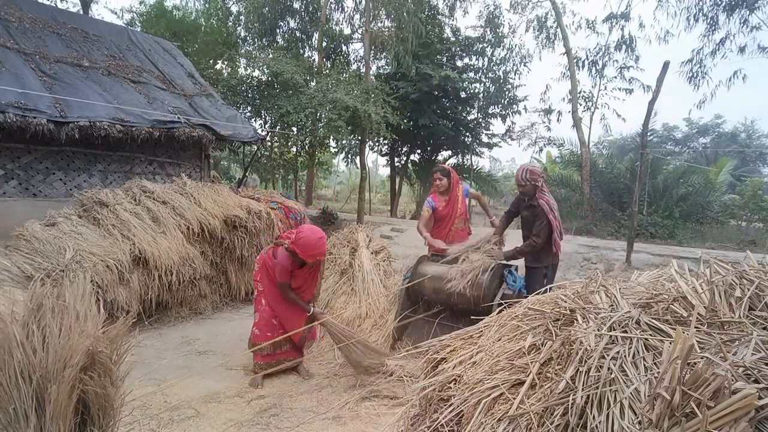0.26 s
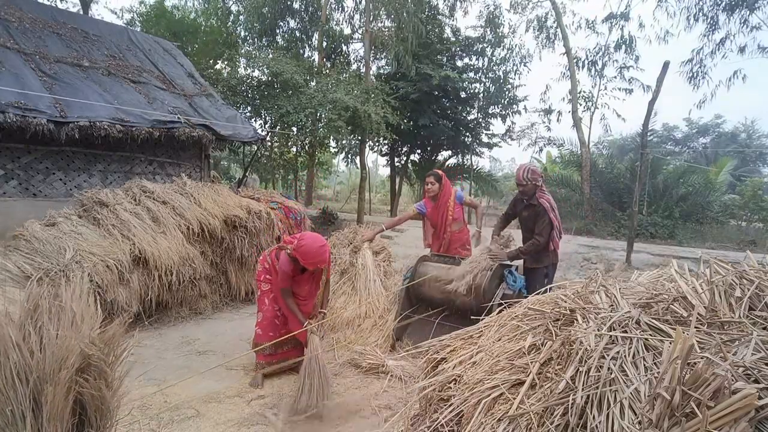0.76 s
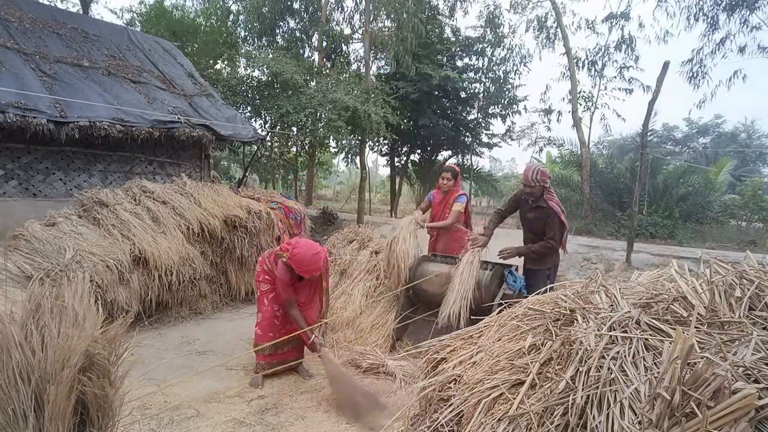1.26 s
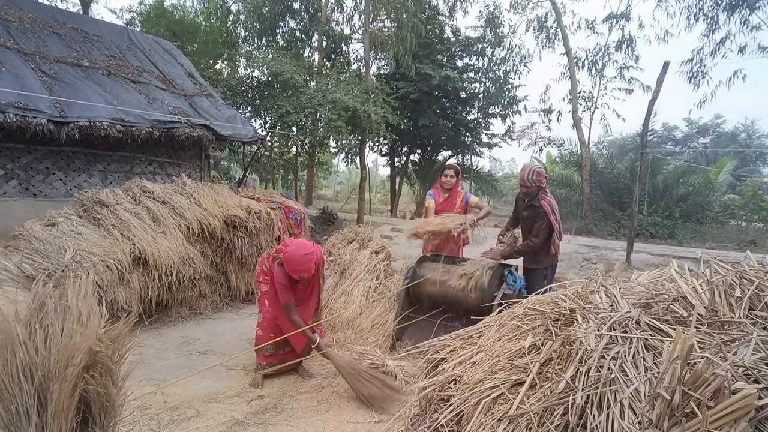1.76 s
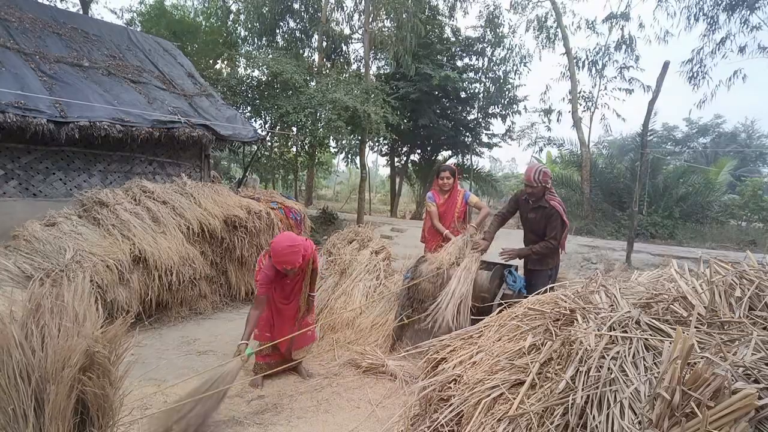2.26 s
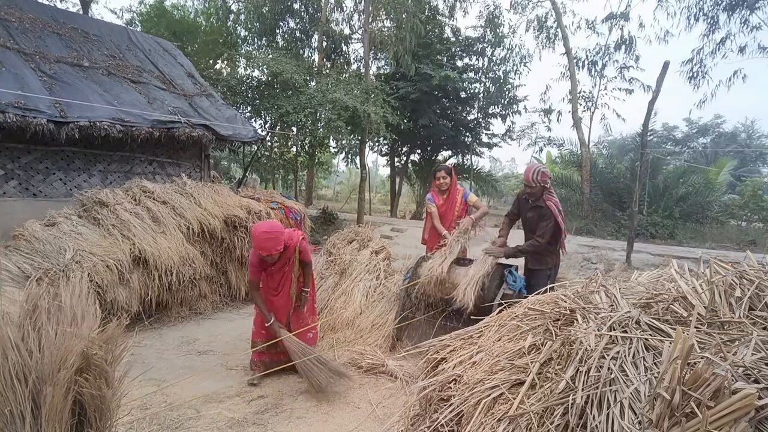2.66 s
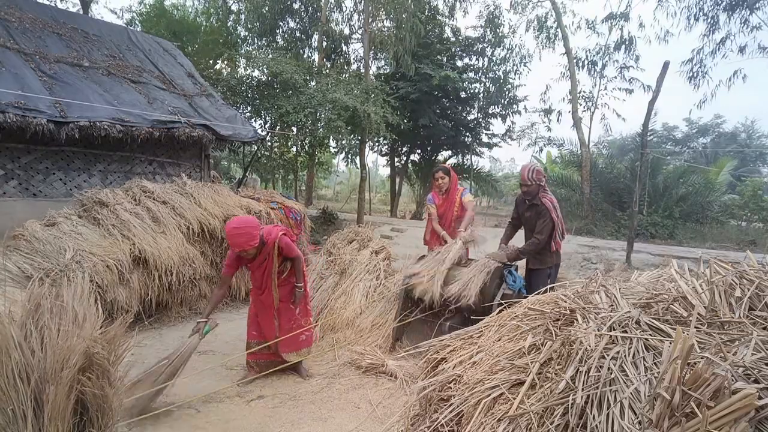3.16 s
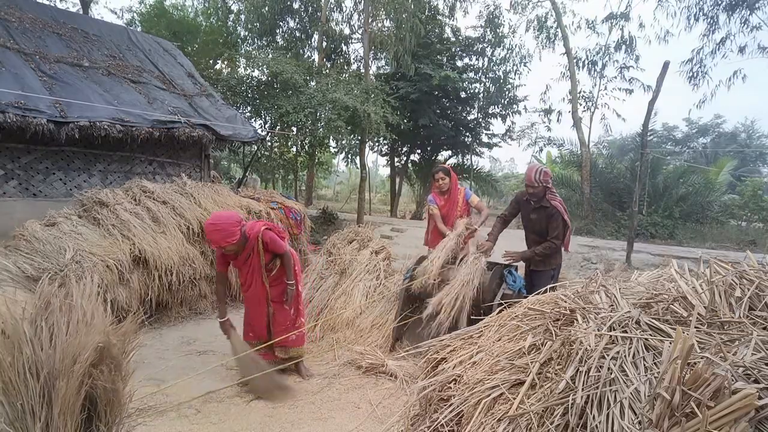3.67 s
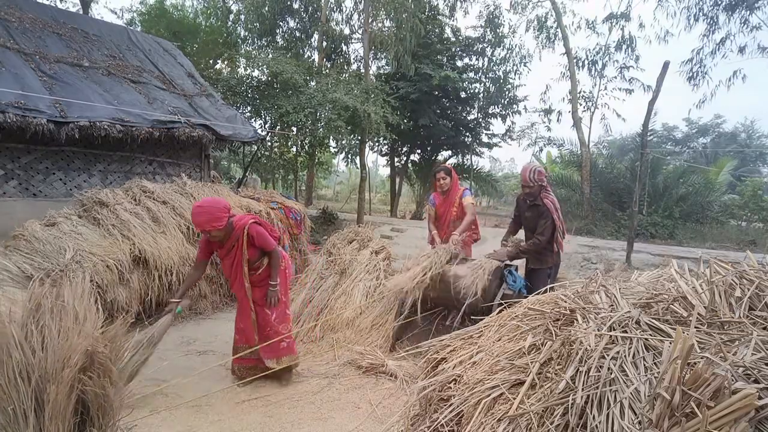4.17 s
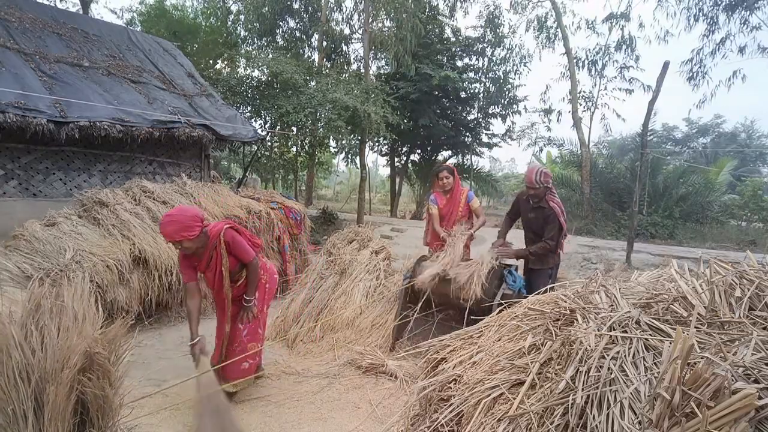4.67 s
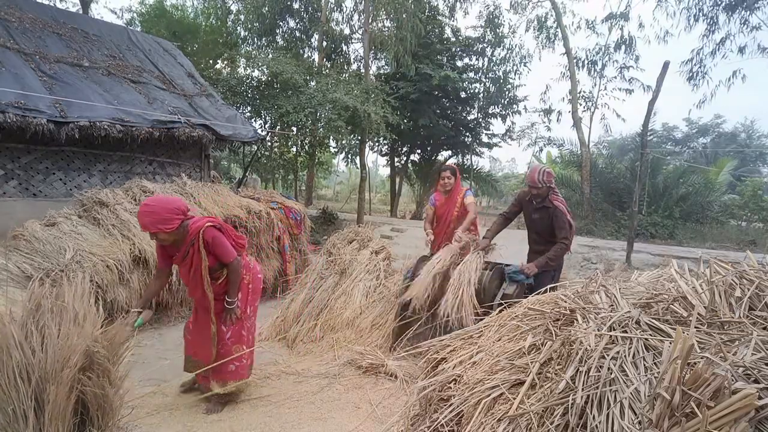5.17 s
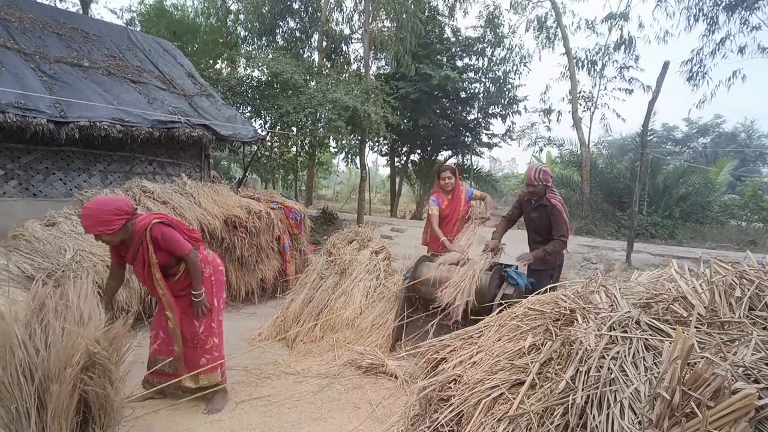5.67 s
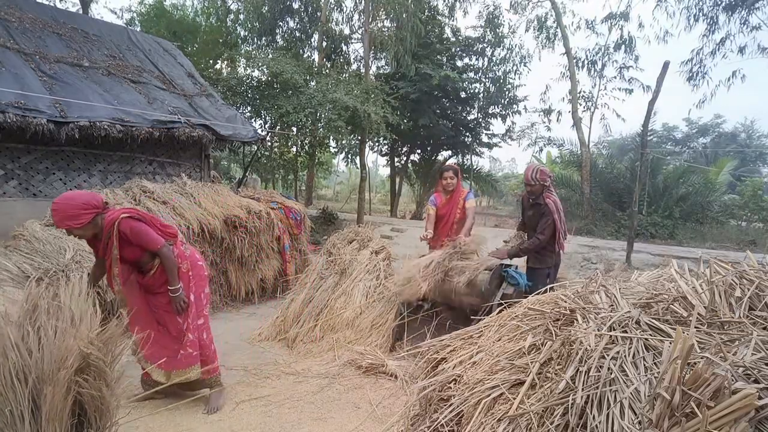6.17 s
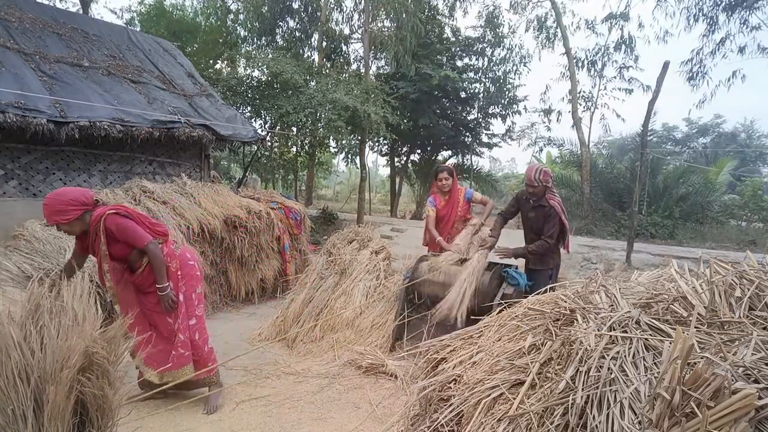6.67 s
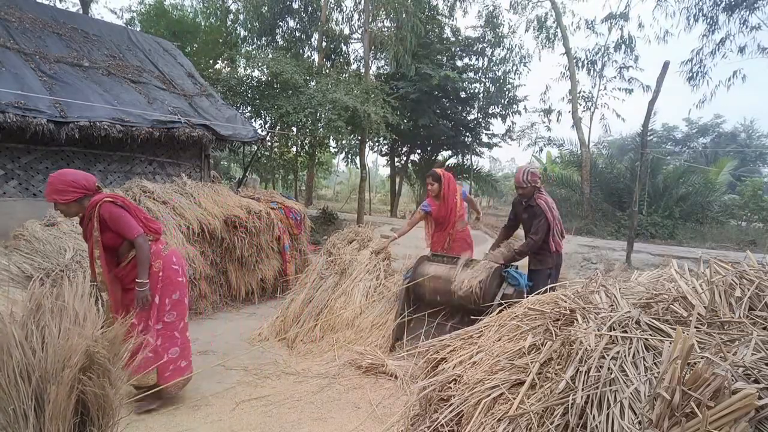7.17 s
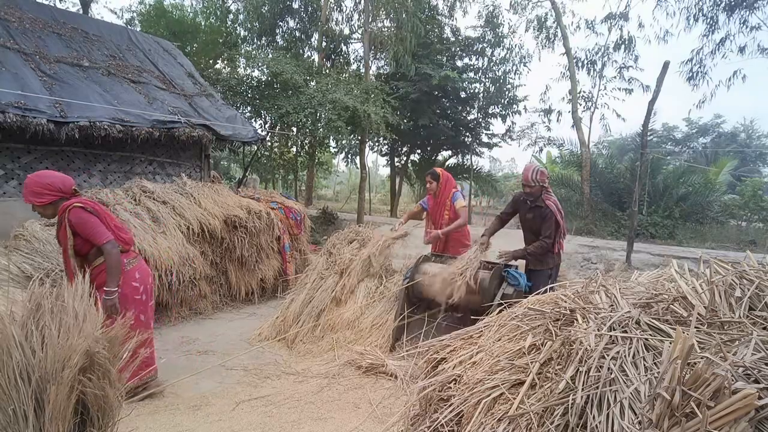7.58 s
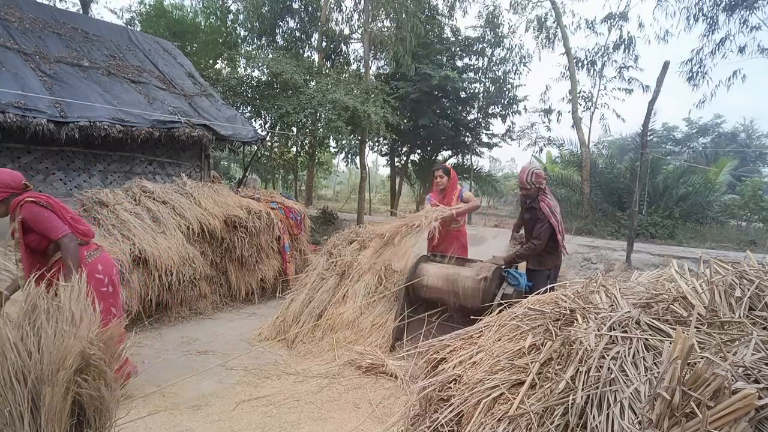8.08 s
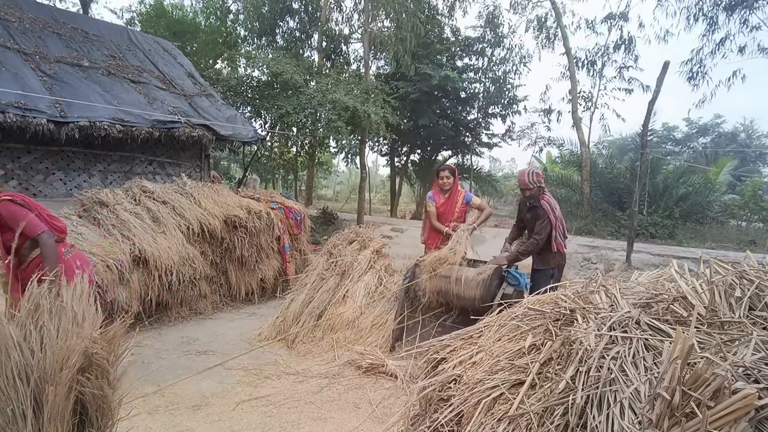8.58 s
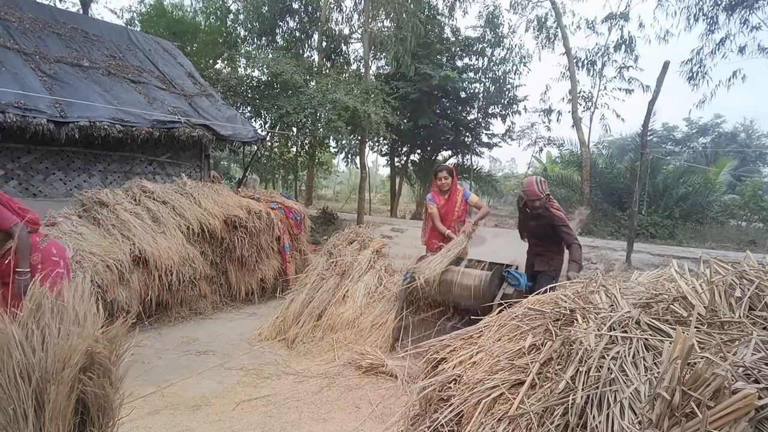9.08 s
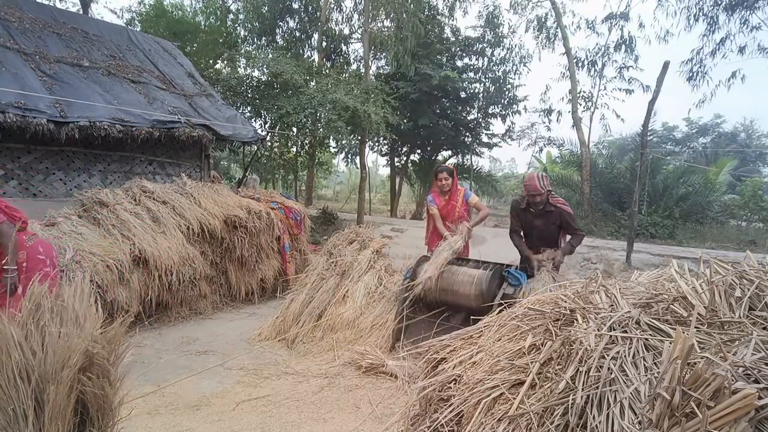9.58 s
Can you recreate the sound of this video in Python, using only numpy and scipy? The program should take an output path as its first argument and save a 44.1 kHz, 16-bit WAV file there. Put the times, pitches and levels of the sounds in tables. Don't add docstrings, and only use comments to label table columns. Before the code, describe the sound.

Continuous fast chugging and metallic clatter of a rice thresher, straw rattling harder as sheaves bite and easing as they lift, through a small bass-poor microphone.

```python
import sys
import numpy as np
from scipy import signal
from scipy.fft import rfft, irfft, next_fast_len
from scipy.io import wavfile
from scipy.ndimage import uniform_filter1d

SR = 44100
rng = np.random.default_rng(int(sys.argv[2]) if len(sys.argv) > 2 else 0)


def boost(x):
    u = np.asarray(x, float) / 20
    return 10 ** u


def materialize(psi):
    bounded = np.clip(np.atleast_2d(psi).T, -1, 1)
    quanta = np.round(bounded * 32767).astype(np.int16)
    wavfile.write(sys.argv[1], SR, quanta)


N = 433062
EDGE_HZ = 4040
UPPER_HZ = 2350
SAME_FIRING_S = .02


def unit(x):
    return x / np.sqrt(np.mean(x ** 2) + 1e-20)


def along(points, hz):
    f, db = np.transpose(points)
    return boost(np.interp(np.log(hz + 1), np.log(f + 1), db))


def curve(s, db):
    return boost(np.interp(np.arange(N) / SR, s, db))


def filtered(x, response):
    m = next_fast_len(N + SR // 2)
    return irfft(rfft(x, m) * response(np.fft.rfftfreq(m, 1 / SR)), m)[:N]


def band_gain(x, gain, low_hz, high_hz):
    return x + (gain - 1) * filtered(x, lambda f: (f > low_hz) * (f < high_hz))


def rings(modes, f):
    total = 0
    for k, (centre, width, db) in enumerate(modes):
        damping = 1j * f * width
        total = total + (-1) ** k * boost(db) * damping / (centre * centre - f * f + damping)
    return total


def smooth_noise(size):
    once = uniform_filter1d(rng.standard_normal(N), size=size)
    return unit(uniform_filter1d(once, size=size))


def tiles(shape, size):
    values = np.clip(rng.standard_normal((shape[0] // size + 1, shape[1])), -3, 1)
    return np.repeat(values, size, axis=0)[:shape[0]]


def patchy(patchy_db):
    z = signal.stft(rng.standard_normal(N + SR), nperseg=2048)[2]
    z = z * boost(patchy_db * tiles(z.shape, size=14))
    return unit(signal.istft(z, nperseg=2048)[1][:N])


def played(s, db, shape, scatter_db):
    size = boost(db + scatter_db * np.clip(rng.standard_normal(len(s)), -2, 1.5))
    hits = np.bincount(np.round(s * SR).astype(int), size, N + SR)
    return signal.fftconvolve(hits, shape)[:N]


def fall(rise, t60):
    t = np.arange(SR // 8) / SR
    return boost(-60 * t / t60) * (1 - np.exp(-t / rise))


# time in seconds, firings so far [count].
CRANK_TURNS = [(0.0275, 0), (0.6819, 9), (1.3327, 18), (1.9872, 27), (2.6395, 36), (3.2962, 45),
               (3.9472, 54), (4.6029, 63), (5.2603, 72), (5.909, 81), (6.5622, 90), (7.2115, 99),
               (7.8662, 108), (8.5192, 117), (9.1695, 126), (9.748, 134)]


def firing_times():
    s, count = np.transpose(CRANK_TURNS)
    return np.interp(np.arange(count[-1] + 1), count, s)


# start in seconds, load in dB, easing in seconds.
SHEAF_BITES = [(0.1, 5.5, 0.31), (0.537, 0.5, 0.035), (0.827, 6, 0.024), (1.333, 2.5, 0.2),
               (1.914, 9.5, 0.14), (2.204, 3, 0.059), (2.567, 8, 0.027), (2.858, 1.5, 0.11),
               (3.004, 3.5, 0.1), (3.513, 6, 0.57), (4.749, 3.5, 0.41), (5.261, 1.5, 0.06),
               (5.404, 10, 0.13), (6.054, 4, 0.04), (6.127, 4, 0.69), (6.995, 4, 0.084), (7.14, 2.5, 0.033),
               (7.575, 3.5, 0.19), (8.011, 6, 0.35), (8.88, 1.5, 0.096), (9.168, 4, 0.57),
               (9.459, 3.5, 0.21), (9.603, 1.5, 0.11)]
# start in seconds, load in dB, length in seconds.
LIGHT_RUNS = [(0.754, -11, 0.07), (1.26, -4.5, 0.07), (1.551, -9.5, 0.07), (1.842, -6.5, 0.07),
              (2.06, -4, 0.07), (2.277, -8.5, 0.15), (2.712, -2, 0.15), (3.223, -2, 0.22),
              (3.73, -7.5, 0.07), (4.384, -5.5, 0.07), (4.968, -1.5, 0.15), (5.187, -0.5, 0.07),
              (5.332, -6, 0.15), (5.765, -4.5, 0.07), (5.909, -10, 0.07), (6.634, -2, 0.29),
              (7.357, -3, 0.15), (8.447, -8.5, 0.29), (8.519, -3.5, 0.07), (8.736, -2.5, 0.07),
              (9.025, -3.5, 0.07), (9.676, -6, 0.07)]


def strength(odd, usual_db=0, db_per_load_db=0):
    s = firing_times()
    load_db = np.zeros(len(s))
    for at, db, easing in SHEAF_BITES:
        load_db += db * np.exp(-np.abs(s - at) / easing) * (s > at - SAME_FIRING_S)
    for at, db, length in LIGHT_RUNS:
        load_db += db * (s > at - SAME_FIRING_S) * (s < at + length - SAME_FIRING_S)
    odd_db = sum(db * (np.abs(s - at) < SAME_FIRING_S) for at, db in odd)
    return usual_db + db_per_load_db * load_db + odd_db


def bursts(contacts, firing_db, rise, scatter_db):
    s = firing_times()
    total = np.zeros(N)
    for late, db, t60 in contacts:
        play = .002 * rng.standard_normal(len(s)) - .004
        total += played(s + late + play, firing_db + db, fall(rise, t60), scatter_db)
    return total


# frequency in Hz, level in dB per Hz.
CRACKLE_SPECTRUM = [(300, -30), (500, 0.5), (2500, -3), (4000, -8), (4300, -40.5)]


def swish():
    clumps = boost(3.3 * unit(uniform_filter1d(rng.standard_normal(N), size=40)))
    grains = clumps * rng.standard_normal(N)
    return boost(-54) * unit(filtered(grains, lambda f: along(CRACKLE_SPECTRUM, f)))


# delay after firing in seconds, level in dB, t60 in seconds.
VALVE_TICKS = [
    (0, 16, 0.032),
    (.017, -2.5, 0.11),
    (.03, -3, .06),
]
# frequency in Hz, level in dB per Hz.
TOP_SPECTRUM = [(2440, -41.5), (4150, -13), (4210, -5), (5160, -12), (6160, -6.5), (6530, -5), (6860, -11),
                (7290, -24.5), (8000, -51), (10400, -81.5), (17600, -120)]
# time in seconds, level in dB.
HISS_LEVEL = [(0.0, -56.5), (1.39, -51), (1.69, -62.5), (1.89, -51), (2.82, -53), (4.67, -55), (5.8, -55),
              (6.21, -56), (6.73, -53.5), (7.19, -56), (7.57, -51.5), (7.9, -57), (8.42, -53),
              (8.61, -51.5), (9.33, -50), (9.82, -56.5)]
# start in seconds, peak in dB, # t60 in
# seconds.
BRIGHT_CRACKS = [(0.448, -36, 0.056), (0.7803, -38, 0.21), (1.025, -38.5, 0.058), (1.202, -55, 0.24),
                 (1.477, -20, 0.06), (1.648, -27.5, 0.13), (1.695, -34, 0.078), (1.7863, -25, 0.059),
                 (2.121, -38, 0.12), (2.529, -29, 0.13), (2.566, -14, 0.039), (3.077, -23.5, 0.07),
                 (3.1524, -24.5, 0.088), (3.73, -34.5, 0.12), (3.877, -35, 0.095), (4.441, -30, 0.11),
                 (4.589, -28.5, 0.057), (5.265, -34, 0.049), (5.8387, -15.5, 0.085), (6.7086, -50.5, 0.1),
                 (7.0665, -45, 0.078), (7.432, -25, 0.054), (7.5018, -37, 0.14), (7.9383, -25, 0.022),
                 (8.157, -36, 0.12), (8.567, -26.5, 0.21), (8.76, -35, 0.12), (9.01, -36, 0.092),
                 (9.095, -38.5, 0.1), (9.6764, -37, 0.11)]


def top_band():
    level = boost(-3.0) * curve(*np.transpose(HISS_LEVEL))
    level += bursts(VALVE_TICKS, -57, rise=.005, scatter_db=5)
    for s, db, t60 in BRIGHT_CRACKS:
        level += played(np.array([s]), db - 14, fall(.005, t60), scatter_db=0)
    return level * unit(filtered(patchy(4), lambda f: along(TOP_SPECTRUM, f) * (f > EDGE_HZ)))


# start in seconds, length in
# seconds, pitch in Hz, level in dB.
LOOSE_PARTS = [(1.4, 0.036, 1830, -28.5), (1.4, 0.046, 1820, -30), (9, 0.046, 1800, -29.5),
               (-.005, 0.023, 464, -22.5), (1.588, 0.032, 968, -31), (8.58, 0.052, 913, -40.5),
               (9, .05, 938, -35.5), (1.2, 0.063, 2300, -34), (1.4, 0.028, 1950, -34),
               (1.7, 0.022, 1000, -33), (5, 0.032, 2170, -32.5), (8.5, 0.11, 366.3, -33),
               (8.577, 0.043, 1587, -40), (9, 0.077, 1820, -35.5)]
# start in seconds, length in seconds, pitch in Hz, level in dB.
HOOD_PANELS = [(-0.0, 0.046, 568, -25), (0.469, 0.035, 1069, -30), (0.544, 0.039, 1131, -28.5),
               (0.544, 0.071, 941, -26), (0.634, 0.035, 553, -30.5), (0.813, 0.03, 2710, -30),
               (1.043, 0.044, 870, -26), (1.781, 0.031, 1060, -28), (1.916, 0.034, 1840, -25),
               (1.921, 0.028, 913, -26), (1.976, 0.026, 2200, -23.5), (2.145, 0.049, 910, -29),
               (2.19, 0.03, 900, -28), (3.033, 0.033, 482, -26), (3.048, 0.065, 979, -28),
               (3.153, 0.04, 679, -24.5), (3.158, 0.019, 976, -27), (3.218, 0.035, 453, -28.5),
               (3.507, 0.035, 446, -26.5), (3.512, 0.068, 1185, -30), (3.512, 0.054, 744, -28.5),
               (3.517, 0.055, 935, -27.5), (3.582, 0.035, 3150, -32), (4.744, 0.12, 975, -26),
               (5.108, 0.045, 970, -28.5), (5.468, 0.04, 877, -28), (5.542, 0.04, 877, -30.5),
               (5.832, 0.028, 648, -29.5), (6.011, 0.066, 862, -31), (6.116, 0.038, 2144, -28.5),
               (6.191, 0.065, 999, -31.5), (6.196, 0.03, 805, -28.5), (6.301, 0.055, 900, -27),
               (6.435, 0.03, 1090, -30.5), (6.47, 0.035, 933, -26.5), (6.56, 0.022, 1800, -28.5),
               (6.58, 0.023, 980, -32), (7.204, 0.035, 1865, -31), (8.012, 0.06, 474, -29),
               (8.017, 0.045, 1026, -24), (8.156, 0.064, 878, -30), (9.179, 0.032, 986, -29.5),
               (9.319, 0.039, 926, -25.5), (9.414, 0.045, 560, -27.5), (9.449, 0.045, 880, -25.5),
               (9.468, 0.097, 993, -28), (9.528, 0.037, 1905, -29.5), (9.563, 0.051, 527, -28.5),
               (9.598, 0.051, 3180, -29.5), (9.678, 0.044, 965, -33.5)]


def singing():
    sag_per_s = 1.23
    out = np.zeros(N + SR)
    for s, length, hz, db in list(LOOSE_PARTS) + list(HOOD_PANELS):
        t = np.arange(round(length * SR)) / SR
        bent_t = t + sag_per_s * t * (length - t) / 2
        tone = np.sin(np.pi * t / length) * np.sin(2 * np.pi * hz * bent_t)
        out[round(max(s, 0) * SR):][:len(t)] += boost(db) * tone
    return boost(1.5) * out[:N]


# delay after firing in seconds, level in dB, pitch in Hz,
# rise in seconds, direction (push +1 or pull -1).
EXHAUST_PUFFS = [
    (.0115, -8, 215, .004, 1),
    (.0158, -3, 165, .005, 1),
    (.0365, -3, 208, .003, -1),
    (.0537, 0, 208, .003, 1),
    (.06, -8, 170, .006, 1),
    (.015, -10, 118, .008, 1),
]
# frequency in Hz, width in Hz, level in dB.
PIPE_MODES = [
    (166, 16, -2),
    (222, 16, 0),
]
# frequency in Hz, level in dB per Hz.
RUMBLE_SPECTRUM = [(60, -45.5), (100, 2.5), (170, -2), (230, 2), (300, 0), (500, -40.5)]
# time in seconds, level over the rule in dB.
ODD_THUMPS = [(0.391, -7), (0.609, 4.5), (0.682, -3), (0.754, 8), (1.043, 4.5), (1.116, 5.5), (1.478, 6.5),
              (1.551, 7.5), (1.696, 7.5), (2.35, -7.5), (2.495, 7), (3.658, -6), (3.803, -4), (4.02, 1.5),
              (4.53, -6.5), (5.26, 0.5), (5.404, -5.5), (5.982, 1), (6.562, 2), (6.634, 4.5), (7.284, 6.5),
              (7.721, -10.5), (8.447, 8.5), (9.386, 7), (9.603, -6.5), (9.676, -8)]


def exhaust():
    s = firing_times()
    level_db = strength(ODD_THUMPS, usual_db=-30.5, db_per_load_db=0.33)
    t = np.arange(SR // 10) / SR
    gas = np.zeros(N)
    for late, db, hz, rise, way in EXHAUST_PUFFS:
        puff = t / rise * np.exp(1 - t / rise) * np.sin(2 * np.pi * hz * t)
        gas += way * played(s + late, level_db + db, puff, scatter_db=1.5)
    rumble = unit(filtered(patchy(3), lambda f: along(RUMBLE_SPECTRUM, f)))
    gas += boost(-9) * curve(s + .035, level_db) * rumble
    return boost(3.5) * filtered(gas, lambda f: 1 + np.abs(rings(PIPE_MODES, f)))


# delay after firing in seconds, level in dB, t60 in seconds.
COVER_BLOWS = [
    (.002, 0.72, 0.33),
    (.016, -0.55, 0.05),
    (.028, 0.82, 0.26),
]
# frequency in Hz, width in Hz, level in dB.
COVER_MODES = [(366, 47.3, 0.5), (465, 50, -6), (546.7, 31, -1), (667.6, 51, -2.5), (788, 57, -5.5),
               (867.5, 33, -1.5), (965, 23.2, 2), (1030, 38, -1.5), (1128, 157, -5)]
# time in seconds, level over the rule in dB.
ODD_CLANGS = [(0.028, 3), (0.464, 6), (0.536, 4), (0.609, 3.5), (0.754, 10.5), (0.971, -8), (1.116, -12),
              (1.478, 5), (1.551, 10.5), (1.987, -7), (2.06, -13), (2.931, -4.5), (3.15, 4), (3.513, 5),
              (3.875, -1.5), (4.53, -2.5), (5.332, 8), (5.909, 4), (6.562, 4.5), (6.995, -3.5),
              (7.357, 5.5), (7.43, -3), (7.648, -2), (7.866, -7.5), (8.591, 3), (9.676, 7)]


def casing():
    level_db = strength(ODD_CLANGS, usual_db=-32.5, db_per_load_db=1.18)
    shake = bursts(COVER_BLOWS, level_db, rise=.004, scatter_db=1.5) * patchy(3)
    return boost(14.0) * filtered(shake, lambda f: rings(COVER_MODES, f))


# frequency in Hz, level in dB per Hz.
STRAW_SPECTRUM = [(250, -25), (350, 0.5), (1000, 10.5), (1450, -28), (2200, 2.5), (3300, -12.5),
                  (4000, -19)]
# frequency in Hz, width in Hz, level in dB.
DRUM_MODES = [(335, 89, 3.5), (537.5, 35, 9), (604, 21, -6), (976, 170, 4), (2200, 37, -18), (2806, 330, 0),
              (3770, 210, -6), (4019, 49, -1.5)]
# time in seconds, level over the rule in dB.
ODD_TUFTS = [(0.754, 11), (0.971, 7), (1.26, 7), (1.478, -5.5), (1.551, 7), (1.769, -4.5), (1.842, 14.5),
             (1.987, -3.5), (2.06, -14), (2.35, 7.5), (2.422, 5.5), (2.858, 6.5), (3.15, -5.5), (3.441, 10),
             (4.093, -4), (4.603, -8), (4.676, 2.5), (4.895, 0.5), (4.968, -9), (5.041, 12.5), (5.114, 2.5),
             (5.187, 4), (5.837, -11), (6.344, -6), (6.417, 1), (6.995, 1.5), (8.447, -3), (8.519, 9),
             (9.097, 12), (9.386, 2.5)]


def straw():
    spikes = boost(1.2 * unit(uniform_filter1d(rng.standard_normal(N), size=64)))
    beating = patchy(5) * spikes
    rattle = filtered(beating, lambda f: along(STRAW_SPECTRUM, f) + 1.42 * rings(DRUM_MODES, f))
    level_db = strength(ODD_TUFTS, usual_db=-35, db_per_load_db=1.23)
    return boost(-3) * curve(firing_times() + 0.051, level_db) * unit(rattle)


# time in seconds, peak in dB.
STALK_WHIPS = [(0.029, -17.5), (0.109, -17.5), (0.115, -11.5), (0.467, -13), (0.556, -12), (0.608, -18),
               (0.826, -10), (1.115, -23), (1.19, -14), (1.482, -14.5), (1.7, -13.5), (1.917, -13),
               (1.93, -13.5), (1.99, -8), (2.061, -14), (2.135, -23.5), (2.207, -14), (2.566, -13),
               (2.86, -22), (3.078, -17.5), (3.152, -17.5), (3.167, -15.5), (3.397, -16.5), (3.515, -8),
               (3.583, -6.5), (3.801, -15), (3.877, -13.5), (3.946, -12), (4.092, -15), (4.168, -15.5),
               (4.181, -15), (4.238, -13.5), (4.677, -22.5), (5.044, -26), (5.258, -15), (5.407, -13.5),
               (5.55, -12.5), (5.843, -14.5), (6.126, -10), (6.48, -17.5), (6.711, -21), (6.996, -9.5),
               (7.066, -12), (7.136, -14), (7.571, -11), (7.719, -17.5), (7.868, -19.5), (7.941, -15.5),
               (8.014, -13), (8.086, -15.5), (8.305, -13.5), (8.752, -16.5), (8.89, -14), (9.097, -15.5),
               (9.169, -10), (9.257, -11), (9.313, -17), (9.403, -11), (9.531, -8.5), (9.602, -8)]


def whips():
    s, db = np.transpose(STALK_WHIPS)
    blows = np.bincount(np.round(s * SR).astype(int), boost(db), N)
    bare_blow = boost(-19.0)
    return boost(15) * filtered(blows, lambda f: rings(DRUM_MODES, f) + boost(7.5) * rings(BLOCK_MODES, f)
                              + bare_blow * (f > 400))


# delay after firing in seconds, level in dB, t60 in seconds.
BLOCK_KNOCKS = [
    (0, 7, 0.062),
    (.0165, 1, 0.11),
    (.029, -11, .08),
]
# frequency in Hz, width in Hz, level in dB.
BLOCK_MODES = [(1346, 18, -11.5), (1617, 156, -0.5), (1788.5, 49, 2), (1869, 36.6, 4.5), (2072, 170, -9.5),
               (2509, 15, -1), (2699, 92, -9.5), (2760, 37, -4), (3122, 220, -11.5), (3425, 53, -3.5),
               (3870, 380, -20.5), (3660, 5.7, -7.5)]
# time in seconds, level over the rule in dB.
KNOCK_CYCLES = [(1.043, 0.5), (1.188, 6.5), (1.842, -6), (1.914, -8.5), (2.495, 7), (2.712, -3), (2.931, 2),
                (3.296, 4.5), (3.73, 11), (4.093, 0), (4.384, 6.5), (5.477, -6.5), (5.909, 5.5), (6.054, -11),
                (6.49, -4.5), (6.562, 0), (6.779, 4), (7.067, 2.5), (7.43, 3.5), (8.229, 2), (8.447, 10.5),
                (8.519, 5.5), (8.736, 1.5), (9.025, 7), (9.314, -4), (9.386, -5), (9.676, -8.5), (9.748, 6)]


def knock():
    level_db = strength(KNOCK_CYCLES, usual_db=-31.5, db_per_load_db=1.565)
    shake = bursts(BLOCK_KNOCKS, level_db, rise=.004, scatter_db=1.5) * patchy(4)
    return boost(14.0) * filtered(shake, lambda f: rings(BLOCK_MODES, f) + boost(-13.0) * (f > 1250))


def odd_cycles(x, odd, late_s, low_hz, high_hz):
    return band_gain(x, curve(firing_times() + late_s, strength(odd)), low_hz, high_hz)


def each_cycle(x, peak, depth_db, low_hz, high_hz):
    s, count = np.transpose(CRANK_TURNS)
    turn = np.interp(np.arange(N) / SR, s, count)
    swell = boost(depth_db * np.cos(2 * np.pi * (turn - peak)))
    return band_gain(x, unit(swell), low_hz, high_hz)


# time in seconds, upper rattle in dB.
COLOURED_CYCLES = [(0.173, -6.5), (1.769, 3), (2.06, -3), (2.132, -5), (2.785, 3), (3.004, -3.5),
                   (3.223, -4.5), (3.875, 4), (4.53, 5), (4.603, -0.5), (4.676, -12), (5.041, -1),
                   (5.114, -13), (6.706, 6), (6.779, -2.5), (7.502, 3), (7.648, 7), (8.011, -3.5),
                   (8.447, 8.5), (8.88, 2.5), (8.953, 5), (9.169, 5)]
# time in seconds, level in dB.
BLOCK_CYCLES = [(0.318, -3), (0.536, 1.5), (0.971, -1), (1.043, 4), (1.116, 1), (1.26, 4), (1.624, 2.5),
                (2.06, 7.5), (2.132, -3), (2.35, -2.5), (2.422, 4), (2.567, -6), (2.639, -3.5),
                (2.931, -2.5), (4.093, 5), (4.166, 0), (4.749, -2.5), (4.968, -3.5), (5.041, 8.5),
                (5.404, -5.5), (5.765, -6), (6.127, 2), (6.199, -1), (6.562, 5.5), (6.706, 0), (7.284, 0),
                (7.43, 5.5), (7.648, -5.5), (8.519, -7.5), (8.736, -2), (8.953, -5), (9.242, -6),
                (9.748, -7.5)]
# time in seconds, level in dB.
FRAME_CYCLES = [(0.1, 3.5), (0.754, 6), (0.899, -4), (1.043, 5.5), (1.624, -0.5), (1.769, 3.0), (2.06, 3),
                (2.132, 1), (2.35, 9), (2.567, -6), (2.712, 4), (3.15, 2), (3.296, 5.5), (3.586, -5.5),
                (3.947, 1), (4.457, 4.5), (4.749, -2.5), (4.968, 1.5), (5.404, -1.5), (5.477, -5.5),
                (5.693, -2), (5.837, -0.5), (6.417, 1), (6.779, 5.5), (6.851, 0), (7.067, -2.5), (7.502, 6),
                (7.939, 2), (8.736, 4.5), (9.314, -5), (9.459, -2.5), (9.748, -3.5)]


def scene():
    machine = exhaust() + casing() + straw() + whips() + knock()
    machine = odd_cycles(machine, COLOURED_CYCLES, 0.0073, UPPER_HZ, SR)
    machine = odd_cycles(machine, BLOCK_CYCLES, .03, 1350, UPPER_HZ)
    machine = odd_cycles(machine, FRAME_CYCLES, .03, 290, 650)
    machine = each_cycle(machine, .33, 3.5, 0, 135)
    machine = each_cycle(machine, .36, 2.3, UPPER_HZ, EDGE_HZ)
    machine = each_cycle(machine, .25, 1.5, 700, 1300)
    return (filtered(machine, lambda f: f < EDGE_HZ) + top_band())[None]


# frequency in Hz, level in dB.
MICROPHONE_RESPONSE = [(20, -31.5), (50, -32), (70, -11), (85, -10), (110, -2.5), (8000, 0.5)]


def microphone(x, share=1, top_hz=SR):
    return filtered(x, lambda f: along(MICROPHONE_RESPONSE, f) ** share * (f < top_hz))


# start in seconds, end in seconds, depth in dB.
DUCKED_MOMENTS = [(1.513, 1.604, -13), (2.29, 2.9, -2), (3.357, 3.346, -10.5), (5.014, 5.08, -8),
                  (5.168, 5.23, -8.5), (5.895, 5.9, -6.5), (6.679, 6.701, -10), (6.786, 6.79, -9.5),
                  (7.441, 7.497, -5.5), (8.466, 8.54, -8.5), (8.7, 8.72, -2.5), (3.699, 3.72, -7),
                  (9.058, 9.055, -9)]


def suppressor(x, contrast, patchy_db):
    seconds = np.arange(N) / SR
    duck_db = np.zeros(N)
    for a, b, db in DUCKED_MOMENTS:
        corners = np.sort([a - .004, a + 0.0023, b - .004, b + 0.025])
        duck_db += db * np.interp(seconds, corners, [0, 1, 1, 0])
    hz, _, z = signal.stft(x, SR, nperseg=1408)
    hz = hz[:, None]
    power = np.abs(z) ** 2 + 1e-14
    share = power / np.abs(uniform_filter1d(power, size=13, axis=0))
    gain = np.minimum(share, 3) ** (contrast * (hz > 140))
    gain = gain * boost(patchy_db * np.clip(hz / 500, .62, 1) * tiles(z.shape, size=13))
    main = signal.istft(z * gain * (hz < EDGE_HZ), SR, nperseg=1408)[1][:N]
    duck = boost(duck_db)
    spared_bass = 0.26 * (1 - duck) * filtered(main, lambda f: f < 300)
    return duck * main + spared_bass + filtered(x, lambda f: f >= EDGE_HZ)


# start in seconds, length in seconds, repeat rate in Hz.
BUZZING_FRAMES = [
    (1.335, .04, 235),
    (4.335, .035, 250),
    (1.472, .055, 311),
    (1.64, .035, 256),
    (1.695, .035, 428),
    (2.56, .04, 228),
    (4.585, .035, 264),
    (5.83, .045, 306),
    (7.94, .035, 432),
]


def looped(x, feedback):
    y = x.copy()
    for s, length, hz in BUZZING_FRAMES:
        part = slice(round(s * SR), round((s + length) * SR))
        frame = x[part]
        loop = np.r_[1, np.zeros(round(SR / hz) - 1), -feedback]
        comb = signal.lfilter([1], loop, frame * signal.windows.tukey(len(frame), .2))
        fade = np.sqrt(np.hanning(len(comb)))
        y[part] = (1 - fade) * frame + fade * unit(comb) * np.std(frame)
    return y


def hush():
    t = np.arange(N) / SR
    s = np.sort(np.transpose(STALK_WHIPS)[0])
    ahead = np.r_[s, np.inf][np.searchsorted(s, t)] - t
    return boost(-1 * np.exp(-ahead / 0.035))


def pulsed(x, depth_db, low_hz):
    band = lambda f: (f > low_hz) * (f < EDGE_HZ)
    clumps = unit(boost(depth_db * smooth_noise(120)))
    return x + filtered((clumps * hush() - 1) * filtered(x, band), band)


# time in seconds, level in dB.
BASS_CYCLES = [(0.246, -3.5), (0.318, -3.5), (0.754, -2.5), (0.899, 6.5), (1.188, -11.5), (1.333, -13.5),
               (1.478, -15), (1.696, -10), (1.842, -15), (2.06, -11), (2.495, -11), (3.296, -1.5),
               (5.114, 5.5), (5.26, 4.5), (5.621, 3.5), (5.693, -6.5), (5.765, 11), (5.837, -9.5),
               (5.909, -5), (6.851, -13.5), (6.995, -6), (7.284, -5.5), (7.502, 6), (7.721, -12),
               (7.939, 5.5), (8.664, 6.5), (9.242, -6), (9.386, -5.5), (9.676, 8.5)]


def gated(x, depth_db, top_hz):
    flutter = boost(2.75 + depth_db * smooth_noise(2600))
    gain = flutter * curve(firing_times() + 0.046, strength(BASS_CYCLES))
    return x + (gain - 1) * filtered(x, lambda f: 1 / (1 + (f / top_hz) ** 6))


def band_limit(x):
    return signal.sosfilt(signal.butter(12, 8210, fs=SR, output="sos"), x)


def record(dry):
    x = suppressor(microphone(dry[0]), contrast=.45, patchy_db=4.8)
    x = looped(x + swish() + singing(), feedback=.85)
    x = pulsed(x, depth_db=1.5, low_hz=500)
    x = gated(x, depth_db=2.5, top_hz=135)
    x = microphone(x, share=.5, top_hz=8100) + boost(-99.5) * rng.standard_normal(N)
    return band_limit(x[None])


dry = scene()
out = record(dry)
materialize(out)
```